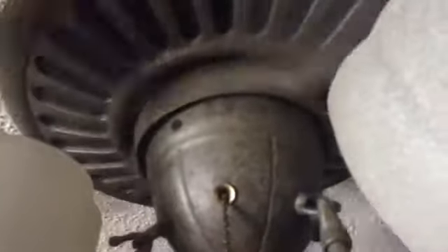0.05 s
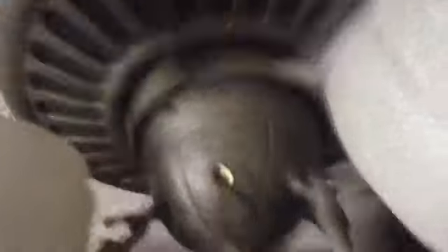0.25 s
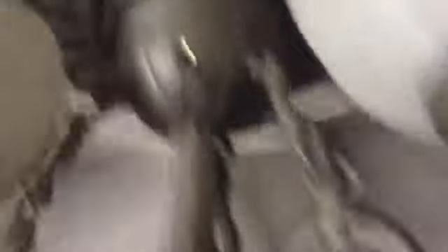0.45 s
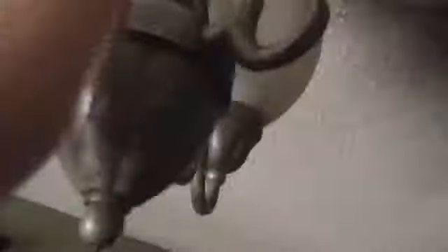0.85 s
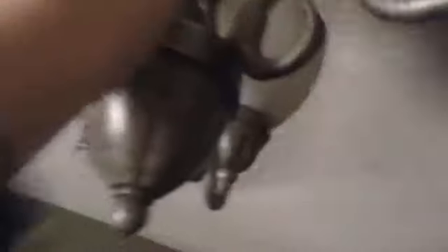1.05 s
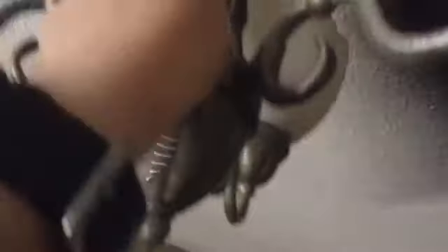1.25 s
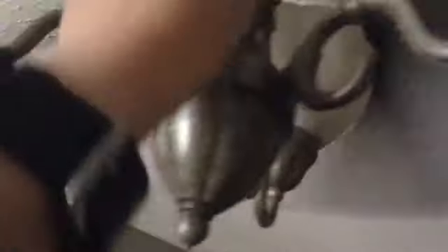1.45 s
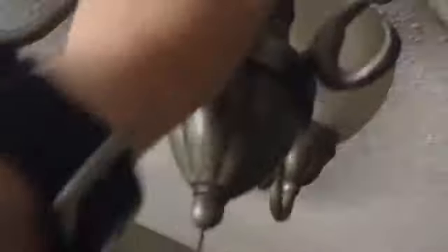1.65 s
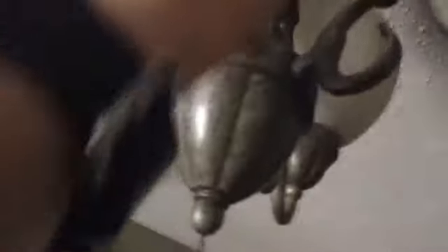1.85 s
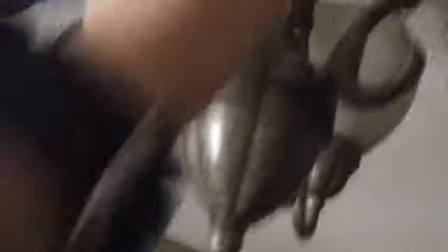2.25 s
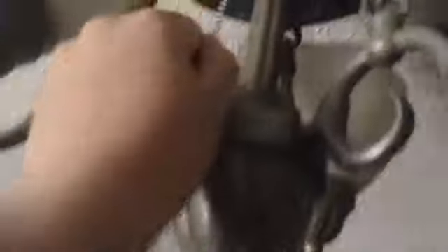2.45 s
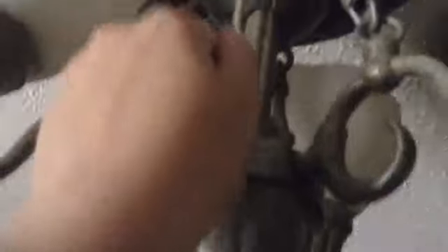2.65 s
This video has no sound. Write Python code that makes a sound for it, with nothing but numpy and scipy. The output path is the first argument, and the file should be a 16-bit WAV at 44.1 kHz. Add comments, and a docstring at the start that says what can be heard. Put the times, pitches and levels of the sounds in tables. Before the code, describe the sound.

A ceiling fan pull chain clicks in a small, quiet room. First, from about 0.2 to 0.6 seconds, fingers rub and bump the camera. Soft knocks and faint ticks of chain beads follow from 0.8 seconds. The chain is pulled at about 1.5, 1.9 and 2.3 seconds, each time with a sharp, slightly ringing metallic click and a softer release click 0.2 seconds later.

```python
"""Over low room tone, fingers rub, scuff and bump a camera as it is carried up to a ceiling fan.
The hand finds the pull chain with soft knocks; the chain slides and its beads tick through the eyelet.
The chain is then worked three times: the switch snaps on each pull and again on each release,
ringing the metal housing and the chain fitting. The small room reflects the fan's sounds and the knocks."""
import sys
import numpy as np
from scipy import signal
from scipy.fft import rfft, irfft
from scipy.io import wavfile

SR = 44100
rng = np.random.default_rng(int(sys.argv[2]) if len(sys.argv) > 2 else 0)


def unload_wav(signal):
    """Save mono or channel-first audio to the path in sys.argv[1] as 16-bit WAV at rate SR, clipped to [-1, 1]."""
    wavfile.write(
        sys.argv[1],
        SR,
        np.round(np.clip(np.atleast_2d(signal).T, -1, 1) * 32767).astype(np.int16),
    )


N = 123479
T = np.arange(N) / SR
TICK_RISE_S = 0.00046


def amp(db):
    """Decibels to gain."""
    return 10 ** (np.asarray(db) / 20)


def unit(x):
    """Scale to rms 1."""
    return x / np.sqrt(np.mean(x ** 2) + 1e-20)


def read(points, hz):
    """Interpolate on a log-frequency axis."""
    f, value = np.transpose(points)
    return np.interp(np.log(hz + 1), np.log(f + 1), value)


def level(points):
    """Level curve as gain, silent outside its span."""
    s, db = np.transpose(points)
    return amp(np.interp(T, s, db)) * (T >= s[0]) * (T <= s[-1])


def add(mix, start_s, sound):
    """Mix a sound in at start_s."""
    part = mix[max(round(start_s * SR), 0):][:len(sound)]
    part += sound[:len(part)]


def colour(x, spectrum, tilt_db_oct=0, peaks=(), bands=((1, 0),), size=2048):
    """Minimum-phase filter of unit power: spectrum, tilt above 1 kHz, resonances, band gains."""
    hz = abs(np.fft.fftfreq(size, 1 / SR))
    db = read(spectrum, hz) + read(bands, hz) + tilt_db_oct * np.log2(np.maximum(hz, 1000) / 1000)
    for centre_hz, width_hz, boost_db in peaks:
        db = db + boost_db / (1 + (2 * (hz - centre_hz) / width_hz) ** 2)
    log_gain = np.log(amp(np.maximum(db, db.max() - 80)))
    fir = np.fft.ifft(np.exp(np.conj(signal.hilbert(log_gain)))).real[:size // 2]
    return signal.fftconvolve(x, fir / np.linalg.norm(fir))[:len(x)]


def decay(t, t60_s):
    """Gain falling 60 dB in t60_s."""
    return np.exp(-np.log(1000) * t / np.maximum(t60_s, 1e-4))


def burst(rise_s, t60_s, count=6000):
    """A blow into many close, short-lived modes, all struck about equally hard."""
    t = T[:count]
    envelope = np.minimum(t / rise_s, 1) * decay(t, t60_s)
    x = rng.standard_normal(count) * envelope
    for _ in range(4):
        whitened = irfft(np.exp(1j * np.angle(rfft(x))), count)
        x = envelope * np.sign(whitened)
    return x


def friction(slips_per_s, spread_db, hiss):
    """Tiny slips of uneven size over a smooth hiss."""
    slips = (rng.random(N) < slips_per_s / SR) * rng.choice([-1., 1.], N)
    slips *= amp(spread_db * np.minimum(rng.exponential(1, N), 3))
    return unit(unit(slips) + hiss * rng.standard_normal(N))


def taps(hits, spectrum, t60_s):
    """Short, soft contacts sharing one spectrum."""
    out = np.zeros(N)
    for s, db in hits:
        add(out, s, amp(db) * colour(burst(TICK_RISE_S, t60_s), spectrum))
    return out


def room_tone(level_db=-57.5):
    """Steady low murmur of air with a faint hiss."""
    air_spectrum = [(15, -76), (25, -40), (86, -27), (110, -3.5), (198, 3.5), (227, -4), (267, -2),
                    (368, -3.5), (631, -10), (741, -12.5), (848, -19), (1170, -14.5), (1850, -20),
                    (3170, -24), (9050, -25), (13200, -27), (15500, -31.5)]  # (frequency [Hz], gain [dB])
    gain = amp(read(air_spectrum, np.fft.rfftfreq(N, 1 / SR)))
    return amp(level_db) * unit(irfft(rfft(rng.standard_normal(N)) * gain, N))


def rustle():
    """Faint noise as the handling begins."""
    rustle_curve = [(0, -60), (.16, -62), (.3, -64), (.45, -84)]  # (time [s], level [dB])
    rustle_spectrum = [(200, -7), (700, -4), (1400, 1.5), (2600, -0.5), (4000, -8.5), (5600, -0.5),
                       (7000, -23), (15000, -39)]  # (frequency [Hz], gain [dB])
    return level(rustle_curve) * colour(rng.standard_normal(N), rustle_spectrum)


def drag():
    """Skin drags dully over the camera body."""
    drag_curve = [(.16, -75), (.19, -46.5), (.22, -48.5), (.262, -36.5), (.285, -57), (.32, -47.5),
                  (.338, -41), (.36, -45), (.39, -39), (.41, -45.5), (.445, -50.5), (.475, -38.5),
                  (.505, -26.5), (.52, -39), (.56, -35.5), (.60, -47), (.625, -64), (.645, -70)]  # (time [s], level [dB])
    drag_spectrum = [(60, -24), (150, 4), (300, 6), (800, 4), (1700, -2.5), (3500, -12), (5500, -17.5),
                     (10000, -35), (15000, -47)]  # (frequency [Hz], gain [dB])
    return level(drag_curve) * colour(friction(slips_per_s=830, spread_db=0.5, hiss=0.82), drag_spectrum)


def scuffs():
    """Small, thin scuffs on the camera."""
    contacts = [(.1842, -43), (.6512, -52)]  # (time [s], level [dB])
    scuff_spectrum = [(2500, -23), (4300, -3), (5800, 2), (7200, -13), (15000, -37)]  # (frequency [Hz], gain [dB])
    return taps(contacts, scuff_spectrum, t60_s=0.024)


def bumps(pitch_sag=0.425, rise_s=0.00042):
    """Fingers bump the camera body: damped cycles sagging in pitch, plus a contact tick."""
    # (time [s], level [dB], start pitch [Hz], t60 [s], relative tick level [dB])
    finger_hits = [(.226, -27.5, 370, 0.0079, -14), (0.2353, -30, 416, 0.15, -19),
                   (0.2517, -26, 546, 0.066, -28), (.2630, -36, 600, 0.045, -7),
                   (.2662, -30, 1040, 0.0027, 5.5), (0.3033, -20, 374, 0.0094, -36),
                   (.3335, -21.5, 513, 0.0033, -3), (.4585, -26.5, 785, 0.0036, -0.5),
                   (.4845, -18.5, 910, 0.021, 0.5), (0.4863, -16.5, 470, 0.0096, 6.5),
                   (.499, -14, 349, 0.013, -13), (0.5021, -11.5, 778, 0.011, -6),
                   (0.5252, -26.5, 274, 0.049, 2), (0.5454, -13.5, 470, 0.0061, -5),
                   (0.563, -20, 457, 0.0087, -4), (0.578, -26, 407, 0.0062, -5),
                   (0.599, -24, 1190, 0.014, -10), (.617, -29, 215, 0.017, -24)]
    tick_spectrum = [(150, -8), (800, 12.5), (2200, 4), (4000, 1.5), (6200, -9.5), (8000, -26),
                     (15000, -46)]  # (frequency [Hz], gain [dB])
    out, t = np.zeros(N), T[:6000]
    for s, db, hz, t60_s, tick_db in finger_hits:
        fade = decay(t, t60_s)
        cycles = np.cumsum(hz * (1 - pitch_sag * (1 - fade) ** 2)) / SR
        envelope = (1 - np.exp(-t / rise_s)) ** 2 * fade
        thud = envelope / envelope.max() * np.sin(2 * np.pi * cycles)
        tick = colour(burst(TICK_RISE_S, t60_s=0.0089), tick_spectrum)
        add(out, s, amp(db) * (thud + amp(tick_db) * tick))
    return out


def brush(split_hz=7300, brighten_db_per_s=121, neutral_s=0.62):
    """Skin brushes the microphone port with a hiss that brightens."""
    brush_curve = [(.44, -51.5), (.48, -48.5), (.525, -44.5), (.537, -35), (.553, -36), (.560, -26.5),
                   (.575, -32), (.60, -29), (.614, -32), (.619, -44), (.629, -34), (.638, -54), (.66, -90)]  # (time [s], level [dB])
    brush_spectrum = [(120, -22), (200, -9.5), (715, -13.5), (1030, -8), (1350, -8.5), (1880, -3.5),
                      (2650, -12), (8500, -14), (11400, -14.5), (15500, -23)]  # (frequency [Hz], gain [dB])
    rub = level(brush_curve) * colour(friction(slips_per_s=1800, spread_db=3.5, hiss=0.7), brush_spectrum)
    treble = signal.sosfiltfilt(signal.butter(2, split_hz, "high", fs=SR, output="sos"), rub)
    treble_db = np.clip(brighten_db_per_s * (T - neutral_s), -12, 4)
    return rub + treble * (amp(treble_db) - 1)


def knocks():
    """Soft knocks as the hand finds and holds the chain."""
    contacts = [(.833, -51), (1.0015, -45), (1.305, -51.5), (1.9745, -41.5), (2.4222, -48), (2.626, -60),
                (2.653, -50.5), (2.667, -52)]  # (time [s], level [dB])
    knock_spectrum = [(60, -45), (300, -40), (800, -2.5), (1300, 3), (1900, 1.5), (3000, -16.5),
                      (8000, -24)]  # (frequency [Hz], gain [dB])
    return taps(contacts, knock_spectrum, t60_s=0.022)


def room(x, build_s=0.009):
    """Dense reflections build up and die, the bass last."""
    decay_times = [(200, 0.7), (1000, 0.34), (4000, 0.34), (8000, .3), (15000, 0.3)]  # (frequency [Hz], t60 [s])
    tail_spectrum = [(200, -14), (900, 7.5), (2500, -2), (6000, 1.5), (15000, -4)]  # (frequency [Hz], gain [dB])
    t = T[:SR // 2]
    hz, s, noise = signal.stft(rng.standard_normal(len(t)), SR, nperseg=256)
    fade = decay(s, read(decay_times, hz)[:, None])
    tail = signal.istft(noise * fade, SR, nperseg=256)[1][:len(t)]
    tail = colour(tail * np.minimum(t / build_s, 1) ** 2, tail_spectrum)
    return signal.fftconvolve(x, tail / np.linalg.norm(tail))[:N]


def chain():
    """Beads tick through the eyelet over the fine, bright rattle of the sliding chain."""
    bead_ticks = [(1.0937, -42, -9), (1.130, -50, -7), (1.150, -50, -3), (1.438, -49, 4),
                  (1.473, -50.5, -4), (1.505, -48, 2), (1.533, -42, -23), (1.6628, -46.5, -3),
                  (1.6895, -52, -2), (1.7018, -41, 2), (1.733, -41, -2), (1.8756, -40, 9),
                  (1.9025, -48, -4), (2.031, -46, -1), (2.073, -42.5, -0.5), (2.1027, -40, -5.5),
                  (2.232, -51, -6), (2.2631, -44.5, -11), (2.2711, -36, -7.5), (2.288, -40.5, 0),
                  (2.421, -43, -1.5), (2.4704, -40, 0.5), (2.495, -55, 5), (2.513, -41, -2)]  # (time [s], level [dB], treble tilt [dB/octave])
    bead_spectrum = [(400, -48), (1300, -30), (3000, -21.5), (4300, -21.5), (6000, -11.5), (8000, -14.5),
                     (10000, -14.5), (13500, -5), (15500, -8)]  # (frequency [Hz], gain [dB])
    bead_resonance = [(9860, 210, 14)]  # (frequency [Hz], width [Hz], boost [dB])
    slide_curve = [(1.25, -79), (1.32, -61), (1.41, -73), (1.49, -60.5), (1.535, -46), (1.62, -55),
                   (1.73, -60), (1.79, -55.5), (1.84, -58.5), (1.91, -52), (2.05, -63.5), (2.18, -76),
                   (2.24, -51.5), (2.45, -68), (2.66, -60), (2.72, -87)]  # (time [s], level [dB])
    slide_spectrum = [(400, -18.5), (1100, 4.5), (2500, -13.5), (6000, -14.5), (9000, -16), (12000, -9.5),
                      (13800, -10), (15500, -8.5)]  # (frequency [Hz], gain [dB])
    slips = friction(slips_per_s=1200, spread_db=1.5, hiss=0.49)
    rattle = signal.fftconvolve(slips, burst(TICK_RISE_S, t60_s=0.011))[:N]
    out = level(slide_curve) * colour(unit(rattle), slide_spectrum)
    for s, db, tilt_db_oct in bead_ticks:
        tick = colour(burst(TICK_RISE_S, t60_s=0.03), bead_spectrum, tilt_db_oct, bead_resonance)
        add(out, s, amp(db) * tick)
    return out


def ring(modes, rise_s=0.0063, detune_hz=24.6, count=24000):
    """Ringing metal: each mode is a close pair of decaying sines that beat."""
    t, out = T[:count], np.zeros(count)
    for hz, db, t60_s in modes + modes:
        detuned_hz = hz + detune_hz * rng.uniform(-1, 1)
        out += amp(db) * decay(t, t60_s) * np.sin(2 * np.pi * (detuned_hz * t + rng.random()))
    return (1 - np.exp(-t / rise_s)) * out / np.sqrt(2)


def switch(case_spread=0.0061):
    """On pull and release the ratchet cracks against its case and rings the housing and chain fitting."""
    # snaps (time [s], level [dB], housing gain [dB], fitting gain [dB], low, middle, top band [dB])
    pulls = [(1.5408, -16.5, 1, -20, -8, -4.5, -2.9), (1.9164, -16.5, -4.6, -35, 2, -1, -0.4),
             (2.2985, -14, -0.12, -17, -2, 1.5, 3.5)]
    releases = [(1.7422, -25.5, -6, -24, -4.5, -10.5, -5), (2.1111, -25.5, -1.5, -23, 4, -2.5, -3),
                (2.5212, -20.5, -3, 1, -4, 1.5, 2.5)]
    # snap spectra (frequency [Hz], gain [dB])
    pull_spectrum = [(240, -64), (400, -15.5), (873, -19.5), (1260, -5), (1610, -11), (2360, -13.5),
                     (2710, -8), (3850, -20.5), (4220, -15), (5480, -13.5), (6000, -9), (8530, -8.5),
                     (11200, 3), (14100, -1.5), (15500, -5.5)]
    release_spectrum = [(240, -63), (400, -40), (1280, -15), (2320, -2.5), (2630, 0), (3060, -16.5),
                        (3300, 0), (3740, -10), (4160, -2), (5000, -2.5), (5480, -4), (5910, -5.5),
                        (8670, -6), (14400, -2), (15500, -9.5)]
    band_hz = [1400, 4300, 14500]  # low, middle, top band [Hz]
    steady_hz = [7500, 11000]  # edges of the span with 0 dB band gain [Hz]
    case_resonances = [(1303, 67, 10), (4185, 210, 7.5), (5960, 530, 9), (7100, 400, 3), (8900, 400, 0.5),
                       (9700, 200, 2.5), (12030, 1340, 5), (12300, 790, -8.5), (14400, 530, -2)]  # (frequency [Hz], width [Hz], boost [dB])
    # metal modes (frequency [Hz], level [dB], t60 [s])
    housing_modes = [(676, -49.5, 0.14), (799, -41.5, 0.033), (835, -31.5, 0.041), (883, -42, 0.13),
                     (966, -44.5, 0.095), (1100, -64, 0.084), (1213, -52, 0.12), (1294, -49, .15),
                     (1437, -58, 0.23)]
    fitting_modes = [(4080, -55, 0.4), (4415, -22.5, 0.024), (4240, -59, 0.11), (4100, -53, 0.14),
                     (4350, -35, .03), (4880, -47, 0.039)]
    out = np.zeros(N)
    for snaps, spectrum in (pulls, pull_spectrum), (releases, release_spectrum):
        for s, db, housing_db, fitting_db, *band_db in snaps:
            bands = sorted(list(zip(band_hz, band_db)) + [(hz, 0) for hz in steady_hz])
            peaks = [(hz * (1 + case_spread * rng.uniform(-1, 1)), width_hz, boost_db)
                     for hz, width_hz, boost_db in case_resonances]
            crack = amp(5) * burst(rise_s=0.0002, t60_s=0.0021)
            body = burst(rise_s=0.00042, t60_s=0.023)
            tail = amp(-15.5) * burst(rise_s=0.00042, t60_s=0.1)
            add(out, s, amp(db) * colour(crack + body + tail, spectrum, peaks=peaks, bands=bands))
            add(out, s, amp(housing_db) * ring(housing_modes) + amp(fitting_db) * ring(fitting_modes))
    return out


def scene(low_cut_hz=134):
    """Fan and knocks sound in the room; handling reaches the microphone directly, with little bass."""
    fan = switch() + chain()
    hand = knocks()
    handling = bumps() + drag() + brush() + rustle() + scuffs()
    handling = signal.sosfilt(signal.butter(2, low_cut_hz, "high", fs=SR, output="sos"), handling)
    reflections = room(amp(-11.5) * fan + amp(-3) * hand)
    return (fan + hand + reflections + handling + room_tone())[None]


def record(dry):
    """Low-pass at 15350 Hz."""
    low_pass = signal.firwin(401, 15350, window=("kaiser", 8), fs=SR)
    return signal.oaconvolve(dry, low_pass[None], "same")


dry = scene()
out = record(dry)
unload_wav(out)
```